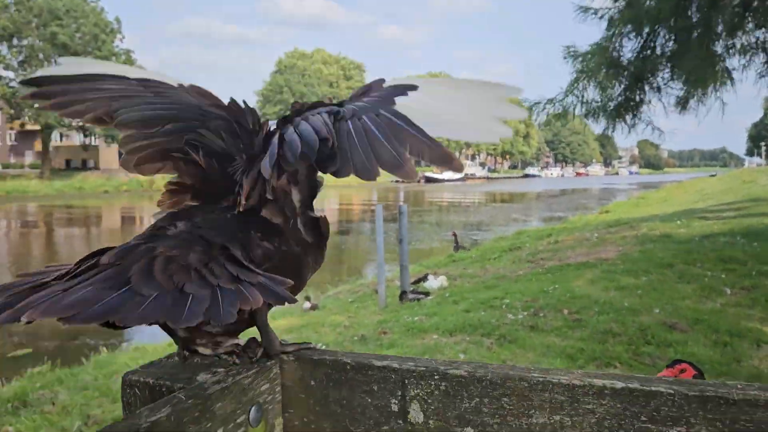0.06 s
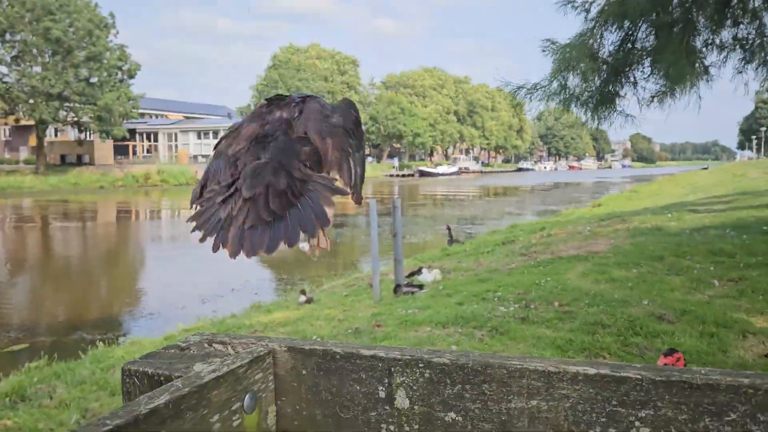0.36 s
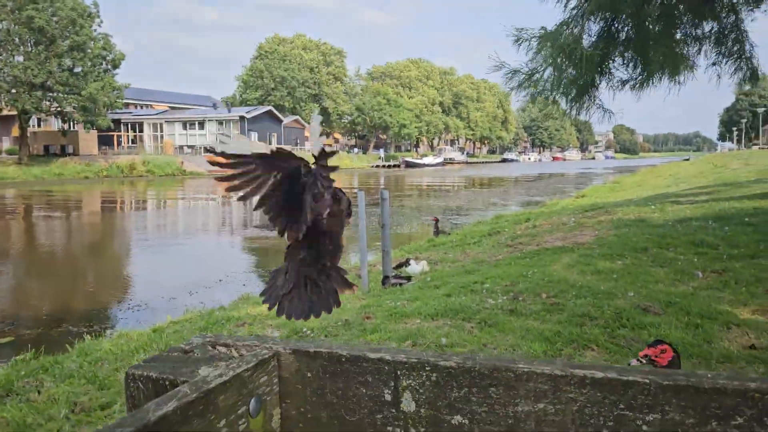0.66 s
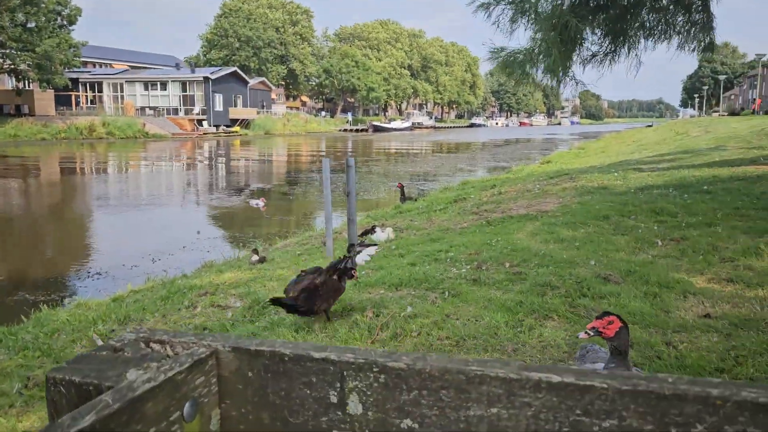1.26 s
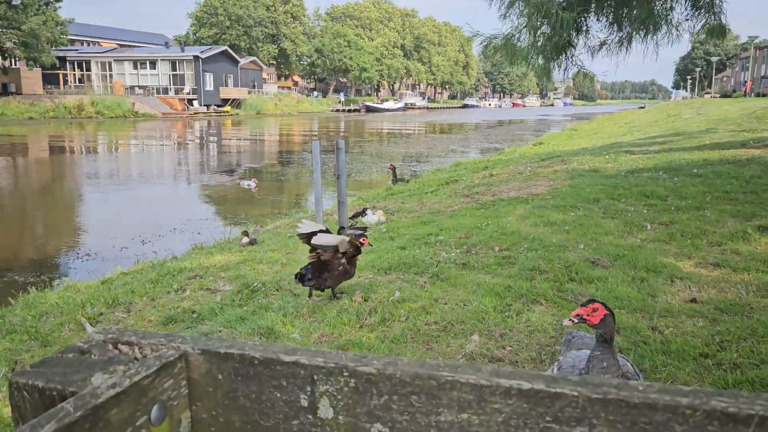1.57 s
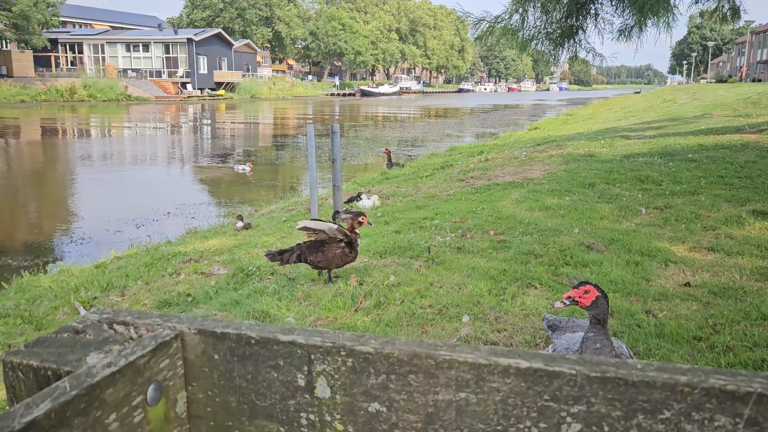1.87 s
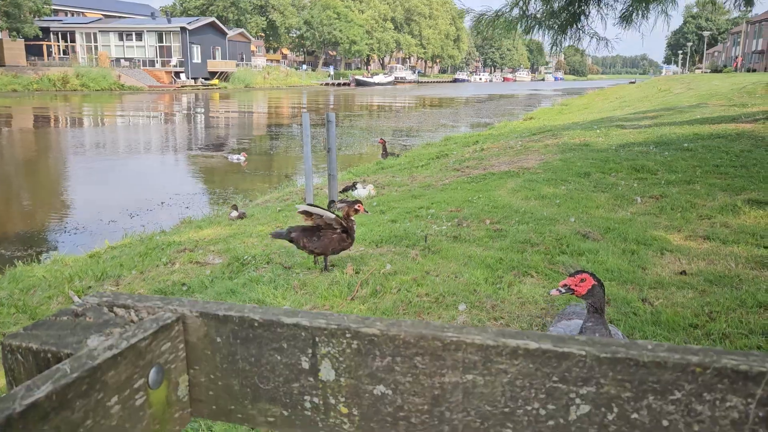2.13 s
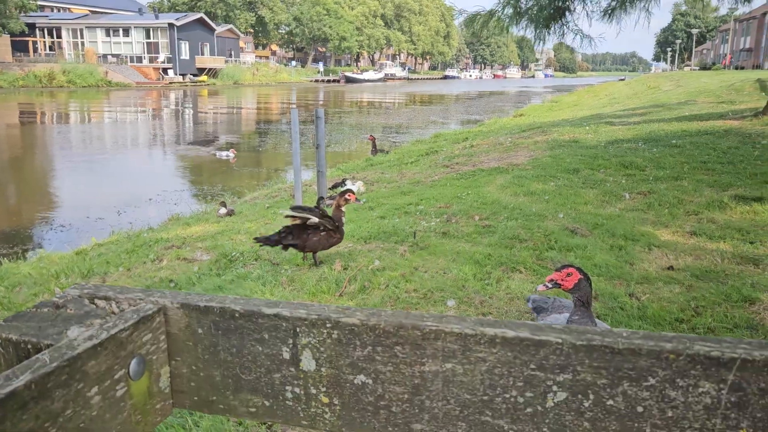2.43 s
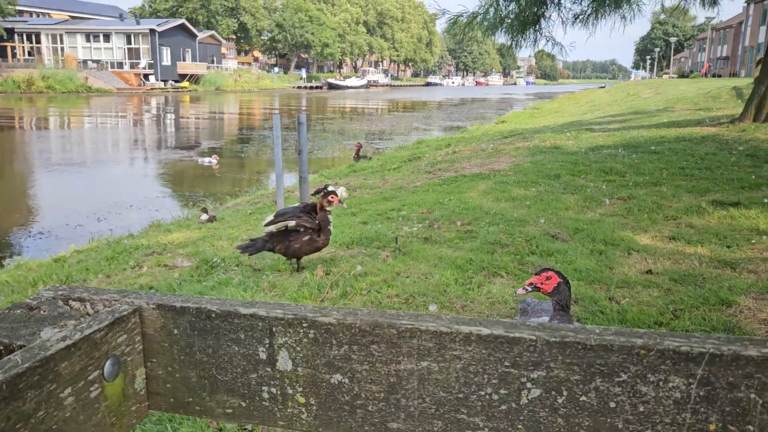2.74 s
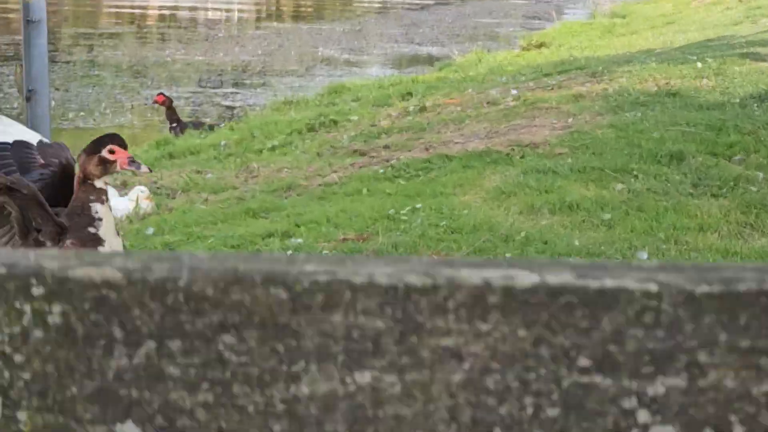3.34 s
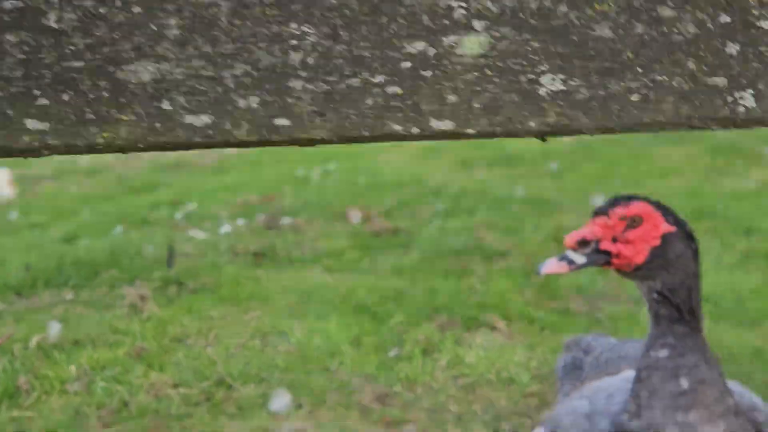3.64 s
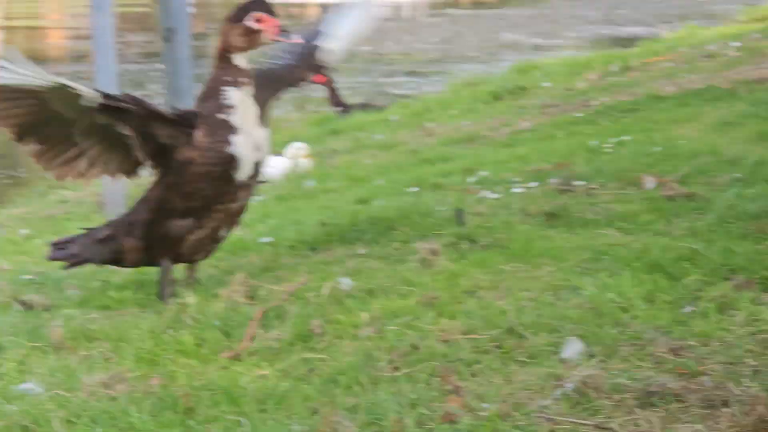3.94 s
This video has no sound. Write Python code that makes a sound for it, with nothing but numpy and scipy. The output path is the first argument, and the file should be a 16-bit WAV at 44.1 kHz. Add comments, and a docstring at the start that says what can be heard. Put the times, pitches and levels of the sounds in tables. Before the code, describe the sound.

A large duck flaps close to a stereo microphone, six quick feathery whooshes with soft thumps of air. Wind then hisses in riverbank trees to one side, over low rumble and distant engines, with a few small bumps and rustles.

```python
"""A grassy riverbank, with a large duck near a stereo microphone. It flaps down from a wooden rail in
six wing beats, each a feathery whoosh ending in a soft thump of air. Off to one side wind hisses in the
trees, cresting in a gust; underneath, low wind rumbles and far engines drone. After the flight a few
small rustles, dull bumps and one tick sound close to the microphone."""
import sys
import numpy as np
from scipy import signal
from scipy.fft import rfft, irfft
from scipy.io import wavfile
from scipy.ndimage import uniform_filter1d

SR = 44100
rng = np.random.default_rng(int(sys.argv[2]) if len(sys.argv) > 2 else 0)


def digitize_waveform(pressure):
    """Quantize a signal to 16-bit integers and store it at the path in sys.argv[1].

    Rows of a 2-D input are taken as channels; values are limited to [-1, 1].
    """
    field = np.atleast_2d(pressure).T
    bounded = np.clip(field, -1, 1)
    quanta = np.round(bounded * 32767).astype(np.int16)
    wavfile.write(sys.argv[1], SR, quanta)


N = 176400
T, HZ = np.arange(N) / SR, np.maximum(np.fft.rfftfreq(N, 1 / SR), 1)
CUTOFF_HZ = 15800

# tones of the far engines: pitch_hz, then one level_db for each of ENGINE_TIMES_S
ENGINE_TONES = [(49.6, -41.5, -43, -41.5), (75.75, -74, -48, -36), (96.6, -37.5, -46.5, -37.5),
                (134.65, -45, -45.5, -34), (152.7, -42.5, -43, -43), (170.3, -55, -49.5, -50),
                (228.3, -54, -64, -50), (249, -66, -55.5, -54), (364.7, -62.5, -63, -59),
                (923, -80, -64, -85)]
# moments between which the engine levels glide: time_s
ENGINE_TIMES_S = [0, 2.2, 3.6]

# course of the low wind and of the trees' four bands, dull to bright: time_s, relative_db
RUMBLE_COURSE = [(0, -36.5), (.35, -32), (.53, -30.5), (.7, -33.5), (.9, -30.5), (1.12, -33.5),
                 (1.5, -33.5), (1.72, -41), (2.2, -33), (2.6, -36.5), (2.85, -31.5), (3.07, -40),
                 (3.3, -31.5), (3.75, -31), (4, -32)]
RUSH_COURSE = [(0, -48), (1.3, -48), (1.7, -47), (2.1, -45), (2.75, -45), (3.1, -51.5), (3.6, -51.5),
               (4, -51)]
LOW_LEAF_COURSE = [(0, -55), (1.2, -56.5), (1.7, -54), (2.1, -51), (2.7, -50), (3.1, -57.5), (3.5, -52.5),
                   (3.7, -59), (4, -59)]
MID_LEAF_COURSE = [(0, -58.5), (.3, -55), (1.1, -55), (1.35, -53), (1.5, -51), (1.7, -50), (1.88, -45.5),
                   (2.04, -46.5), (2.35, -53.5), (2.77, -53), (3.03, -61.5), (3.35, -62), (3.53, -55),
                   (3.8, -55), (4, -57)]
HIGH_LEAF_COURSE = [(0, -48.5), (.4, -46), (.9, -50), (1.2, -49.5), (1.5, -50), (1.76, -50.5), (1.9, -43),
                    (2.15, -40.5), (2.38, -43), (2.8, -45.5), (3.0, -53.5), (3.35, -57.5), (3.65, -58),
                    (3.8, -56), (4, -51)]
# colours of the same five sounds: frequency_hz, density_db
RUMBLE_COLOUR = [(15, -1), (28, -2.5), (44, 10), (65, 4.5), (100, 0), (125, -3), (160, -11), (195, -10),
                 (250, -15.5), (340, -19), (480, -29.5), (900, -75)]
RUSH_COLOUR = [(200, 5.5), (400, 1), (650, -2), (820, -1.5), (1050, 0), (1200, -1), (1400, 1), (1600, 0.5),
               (1900, -4), (2600, -13), (5000, -59)]
LOW_LEAF_COLOUR = [(1400, -6.5), (1820, -4), (1980, 4), (2230, 5.5), (2450, 3), (2800, -1.5), (3300, -35.5)]
MID_LEAF_COLOUR = [(1800, -19), (2400, -11.5), (2850, -0.5), (3500, 0), (4200, -0.5), (4800, -7.5),
                   (5500, -24), (8000, -28.5)]
HIGH_LEAF_COLOUR = [(3500, -11), (4700, 6.5), (5300, 6), (6500, 2), (7500, 2.5), (8500, -1), (9100, -9),
                    (9700, -35), (11000, -16), (12200, -13), (13700, -21), (15200, -20)]
# balance of the trees at the microphone: frequency_hz, left_minus_right_db
TREE_PAN = [(400, 1), (700, 1.5), (950, 3), (1500, -5.5), (2100, -6.5), (3000, -5), (4500, -11),
            (6500, -9.5), (8500, -3.5), (10000, 10), (12000, -4), (15000, 0)]
# how much of the trees' sound both sides share: frequency_hz, power_fraction
TREE_SHARE = [(300, 0.84), (700, 0.58), (1400, 0.8), (3000, 0.64), (5000, 1), (8000, 0.43), (12000, 0.5)]
# the trees reach the right side later: frequency_hz, delay_s
TREE_DELAY = [(1000, 0.00029), (2100, 0.00038), (5000, 0.000431), (7300, 0.000458), (8500, 0.000463),
              (12000, 0.00051)]

# faint rustle at the microphone: time_s, level_db
CLOSE_RUSTLE_COURSE = [(0, -87), (3.35, -90), (3.5, -58), (3.62, -72), (3.74, -56), (3.85, -53.5), (4, -62)]
# short rustles on top of it: peak_s, level_db, rise_and_fall_s
CLOSE_RUSTLES = [(3.666, -61, .005), (3.697, -56, 0.012), (3.812, -52, 0.015), (3.93, -57, .010)]
# colour of the close rustling: frequency_hz, density_db
CLOSE_RUSTLE_COLOUR = [(700, 0), (1400, 5.5), (3500, 4.5), (6000, 0.5), (8000, 0.5), (10000, -18),
                       (12200, -1.5), (14000, -12), (16000, -10)]
# dull bumps at the left of the microphone: start_s, push_db, pitch_hz
CLOSE_BUMPS = [(1.492, -19, 150), (1.5057, -15, 200), (2.853, -17.5, 115), (3.679, -17, 149),
               (3.813, -22.5, 222)]
# resonances of the tick: pitch_hz, push_db
TICK_RING = [(3400, -47), (4400, -37.5), (5100, -40)]

# the duck's downstrokes: peak_s, thump_push_db, thump_hz, buffet_db, whoosh_db, lead_s, hiss_db
DOWNSTROKES = [(0.244, -29, 246, -32, -36, 0.003, -44), (0.387, -19.5, 238, -34.5, -37.5, .001, -49.5),
               (0.535, -26.5, 290, -29.5, -37.5, 0.0086, -44.5), (0.66, -17.5, 272, -28, -39.5, 0.011, -45),
               (.786, -19, 240, -41, -38.5, 0.02, -52), (0.906, -22, 263, -36, -44, .012, -50.5)]
# softer strokes, wings lifting or braking: peak_s, buffet_db, whoosh_db
SOFT_STROKES = [(0.131, -40, -45), (0.266, -34, -51), (0.297, -35.5, -51), (0.421, -31.5, -46.5),
                (0.448, -35.5, -44), (0.559, -37, -51), (0.703, -38, -50), (0.85, -37, -38.5),
                (0.931, -42, -53), (1.111, -44, -43)]
# feathers brushing each other: peak_s, level_db, rise_and_fall_s
FEATHER_FLICKS = [(0.115, -45.5, 0.0094), (0.183, -43, 0.0012), (0.464, -37.5, 0.0036),
                  (0.471, -42, 0.0036), (0.598, -41, .002), (.722, -44.5, .003)]
# air stirred between strokes, and the plumage's fine rustle: time_s, relative_db
WAKE_COURSE = [(0, -63), (.2, -56), (.28, -61), (.55, -49), (.92, -48), (1.15, -55.5), (1.4, -68), (4, -93)]
PLUMAGE_COURSE = [(.02, -65), (.12, -51), (.2, -58), (.27, -48.5), (.34, -62), (.42, -47), (.5, -60),
                  (.55, -50.5), (.75, -56), (.82, -49.5), (.95, -52.5), (1.12, -57.5), (1.22, -76)]
# colours of the wings and feathers: frequency_hz, density_db
BUFFET_COLOUR = [(90, -20), (170, -9), (255, 6), (340, -2), (450, -16), (700, -19.5), (1500, -66)]
WHOOSH_COLOUR = [(200, -0.5), (480, -3.5), (690, 1.5), (900, -13), (1230, -2.5), (1700, -15.5), (3000, -16),
                 (8000, -40)]
FEATHER_HISS_COLOUR = [(900, 2.5), (2500, 7), (5000, -4.5), (8000, 3), (10000, -12), (12500, -20),
                       (16000, -22)]
FLICK_COLOUR = [(1000, -10), (3000, 1.5), (5800, 0), (7700, 5.5), (10000, -5), (13000, -3), (16000, -8)]
PLUMAGE_COLOUR = [(2000, -2.5), (5500, 8.5), (8500, 1), (10000, -3), (12500, 4.5), (16000, -2)]


def from_db(db):
    """Decibels to gain."""
    return 10 ** (np.asarray(db) / 20)


def unit_power(x):
    """Scale to a mean square of one."""
    return x / np.sqrt(np.mean(x ** 2) + 1e-20)


def level(course):
    """Gain over time from rows of time_s, level_db."""
    return from_db(np.interp(T, *np.transpose(course)))


def per_hz(points):
    """A constant, or rows of frequency_hz, value joined on a log axis."""
    if np.isscalar(points):
        return points
    hz, value = np.transpose(points)
    return np.interp(np.log(HZ), np.log(hz), value)


def drift(rate_hz):
    """Random wander of unit power, mostly slower than rate_hz."""
    return unit_power(irfft(rfft(rng.standard_normal(N)) / (1 + (HZ / rate_hz) ** 2), N))


def grain(rate_hz, depth_db):
    """A gain that flickers at random."""
    return unit_power(from_db(depth_db * np.clip(drift(rate_hz), -2, 2)))


def pan(db):
    """Left and right gains, the left louder by db."""
    return from_db(np.array([[.5], [-.5]]) * db) / np.sqrt((from_db(db) + from_db(-db)) / 2)


def noise(colour, share, pan_db, delay_s=0):
    """Coloured stereo noise; the part both sides share reaches the right one delay_s later."""
    common, own = rfft(rng.standard_normal(N)), rfft(rng.standard_normal((2, N)))
    fraction = per_hz(share)
    arrival = np.exp(-2j * np.pi * HZ * per_hz(delay_s) * np.array([[0], [1]]))
    spectrum = np.sqrt(fraction) * common * arrival + np.sqrt(1 - fraction) * own
    return unit_power(irfft(spectrum * from_db(per_hz(colour)) * pan(per_hz(pan_db)), N))


def steadied(x, span_s):
    """Even out the level of a stereo noise, keeping flutter quicker than span_s."""
    power = uniform_filter1d(np.mean(x ** 2, axis=0), int(span_s * SR))
    return unit_power(x / np.sqrt(power + np.mean(power) / 20))


def swell(peak_s, db, rise_s, fall_s):
    """A rounded rise to a peak and an exponential fall."""
    age = T - peak_s
    exponent = np.where(age < 0, (age / rise_s) ** 2, age / fall_s)
    return from_db(db) * np.exp(-np.minimum(exponent, 50))


def knock(start_s, push_db, pitch_hz, t60_s, lowpass_hz):
    """One push into a damped resonance, its top softened."""
    push = np.full(N, 1e-18)
    push[int(start_s * SR)] += from_db(push_db)
    decay, turn = from_db(-60 / (t60_s * SR)), 2 * np.pi * pitch_hz / SR
    ring = signal.lfilter([0, np.sin(turn)], [1, -2 * decay * np.cos(turn), decay ** 2], push)
    return signal.lfilter(*signal.butter(1, lowpass_hz, fs=SR), ring)


def far_engines():
    """Engines in the distance: tones that waver slowly in pitch, level and phase between the sides."""
    drone = 0
    for pitch_hz, *levels_db in ENGINE_TONES:
        wavering_hz = pitch_hz * (1 + 0.00615 * drift(rate_hz=2.19))
        cycles = np.cumsum(wavering_hz) / SR + rng.random()
        level_db = np.interp(T, ENGINE_TIMES_S, levels_db) + 2.5 * drift(rate_hz=3.7)
        spread_rad = 0.39 * drift(rate_hz=1.1) * np.array([[.5], [-.5]])
        drone += from_db(level_db) * np.sqrt(2) * np.sin(2 * np.pi * cycles + spread_rad)
    return drone * pan(db=0.66)


def low_wind():
    """Eddies of wind rumble, much alike on both sides of the microphone."""
    eddies = noise(RUMBLE_COLOUR, share=0.83, pan_db=0.66)
    return level(RUMBLE_COURSE) * steadied(eddies, span_s=0.14)


def trees():
    """Wind in foliage off to one side: a far, dull rush under three flickering bands of leaf hiss."""
    placement = TREE_SHARE, TREE_PAN, TREE_DELAY
    rush = level(RUSH_COURSE) * noise(RUSH_COLOUR, *placement)
    low = level(LOW_LEAF_COURSE) * noise(LOW_LEAF_COLOUR, *placement)
    mid = level(MID_LEAF_COURSE) * from_db(2.5) * noise(MID_LEAF_COLOUR, *placement)
    high = level(HIGH_LEAF_COURSE) * from_db(-3) * noise(HIGH_LEAF_COLOUR, *placement)
    return rush + sum(hiss * grain(rate_hz=51, depth_db=1.1) for hiss in (low, mid, high))


def close_bumps():
    """Dull, quickly damped bumps at the left side of the microphone."""
    return sum(knock(s, db, hz, t60_s=0.018, lowpass_hz=700) for s, db, hz in CLOSE_BUMPS) * pan(db=18)


def close_rustles():
    """Small rustles just right of the microphone, and one sharp tick that rings briefly."""
    tick_s = 3.912
    rustle = level(CLOSE_RUSTLE_COURSE) + sum(swell(s, db, span, span) for s, db, span in CLOSE_RUSTLES)
    tick = swell(tick_s, db=-41, rise_s=0.0009, fall_s=0.0018)
    ring = sum(knock(tick_s, db, hz, t60_s=0.02, lowpass_hz=CUTOFF_HZ) for hz, db in TICK_RING)
    texture = grain(rate_hz=420, depth_db=1.5) * noise(CLOSE_RUSTLE_COLOUR, share=0.29, pan_db=-6)
    return (rustle + tick) * texture + ring * pan(db=-7)


def feathers():
    """The duck's feathers hiss with each beat, flick together and rustle as single barbs snap."""
    snaps_per_s, snap_fall_s = 61, 0.0016
    hiss = sum(swell(s - lead_s, db, rise_s=0.013, fall_s=0.041) for s, *_, lead_s, db in DOWNSTROKES)
    flicks = sum(swell(s, db, span, span) for s, db, span in FEATHER_FLICKS)
    snaps = (rng.random(N) < snaps_per_s / SR) * rng.uniform(1, 3, N) * from_db(-3.5)
    crackle = signal.lfilter([1], [1, -np.exp(-1 / (snap_fall_s * SR))], snaps)
    rustle = level(PLUMAGE_COURSE) * unit_power(1 + crackle)
    return (hiss * noise(FEATHER_HISS_COLOUR, share=0.36, pan_db=-0.5)
            + flicks * noise(FLICK_COLOUR, share=0.3, pan_db=-2)
            + rustle * noise(PLUMAGE_COLOUR, share=0.066, pan_db=-2))


def wings():
    """Nearby, each downstroke whooshes, buffets the air and thumps; the strokes between are softer."""
    pan_db, delay_s = 1.5, 0.00017   # just left of centre
    soft_stroke_s, thump_lead_s = 0.0069, 0.00307
    buffet = whoosh = thumps = 0
    for peak_s, buffet_db, whoosh_db in SOFT_STROKES:
        buffet += swell(peak_s, buffet_db, soft_stroke_s, soft_stroke_s)
        whoosh += swell(peak_s, whoosh_db, soft_stroke_s, soft_stroke_s)
    for peak_s, push_db, thump_hz, buffet_db, whoosh_db, lead_s, _ in DOWNSTROKES:
        whoosh += swell(peak_s - lead_s, whoosh_db, rise_s=0.013, fall_s=0.022)
        buffet += swell(peak_s, buffet_db, rise_s=0.012, fall_s=0.0076)
        thumps += knock(peak_s - thump_lead_s, push_db, thump_hz, t60_s=0.055, lowpass_hz=300)
    wake = level(WAKE_COURSE)
    buffet_air = noise(BUFFET_COLOUR, share=1, pan_db=pan_db, delay_s=delay_s)
    whoosh_air = noise(WHOOSH_COLOUR, share=1, pan_db=1, delay_s=delay_s)
    return ((buffet + from_db(-2) * wake) * steadied(buffet_air, span_s=0.0083)   # rounded pushes
            + np.hypot(whoosh, wake) * whoosh_air
            + thumps * pan(pan_db))


def scene():
    """The riverbank from the far background to the duck."""
    return far_engines() + low_wind() + trees() + close_bumps() + close_rustles() + feathers() + wings()


def record(dry):
    """The top is cut steeply above CUTOFF_HZ."""
    return signal.sosfilt(signal.ellip(12, .1, 80, CUTOFF_HZ, fs=SR, output="sos"), dry)


dry = scene()
out = record(dry)
digitize_waveform(out)
```